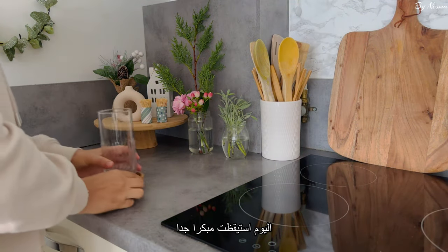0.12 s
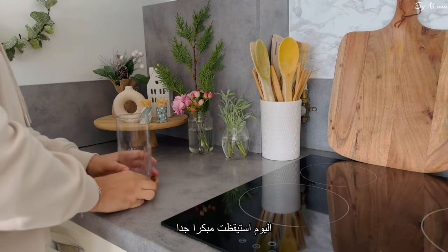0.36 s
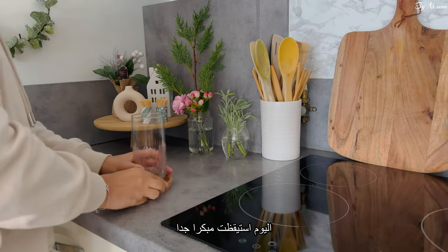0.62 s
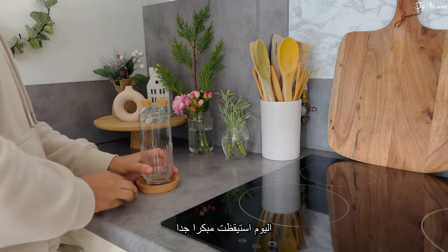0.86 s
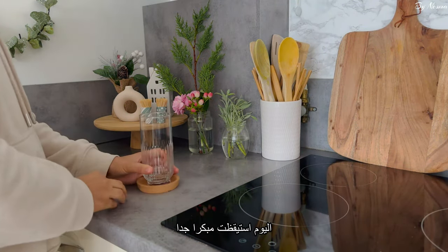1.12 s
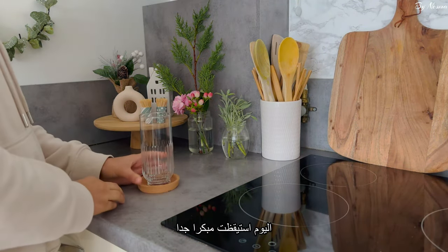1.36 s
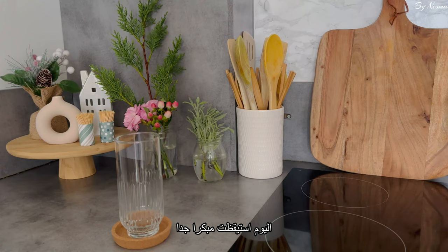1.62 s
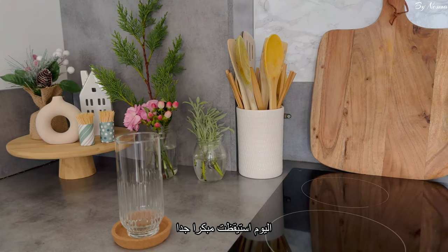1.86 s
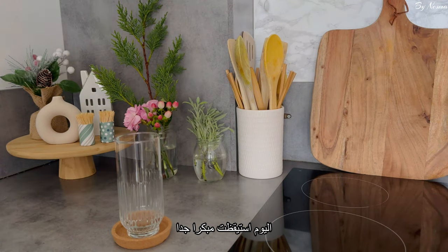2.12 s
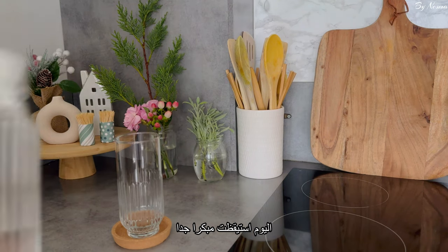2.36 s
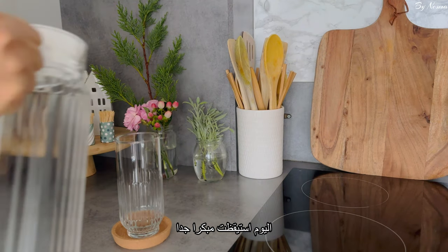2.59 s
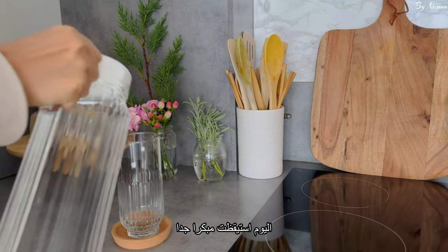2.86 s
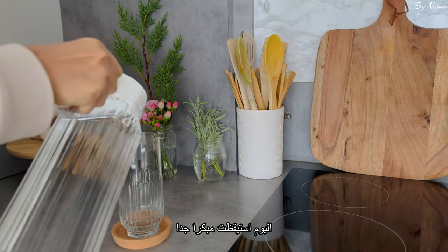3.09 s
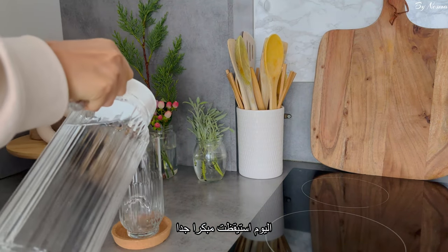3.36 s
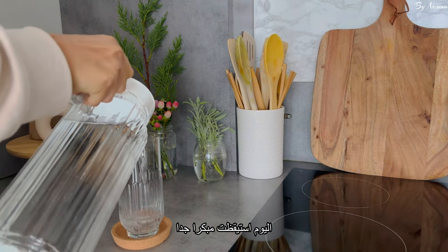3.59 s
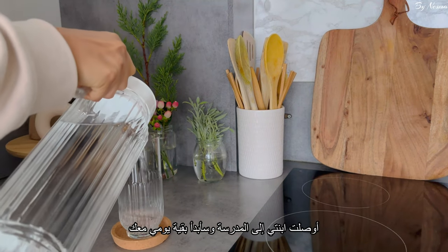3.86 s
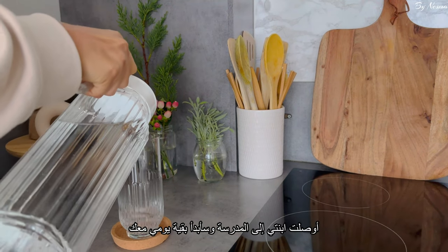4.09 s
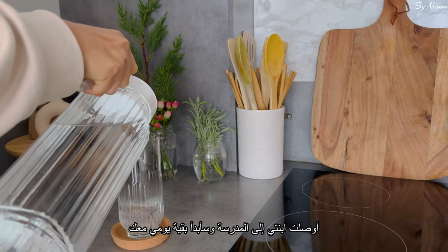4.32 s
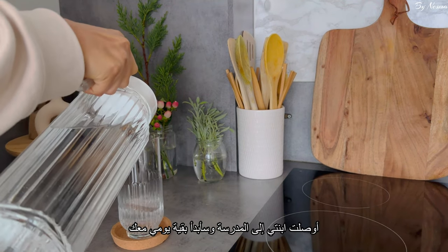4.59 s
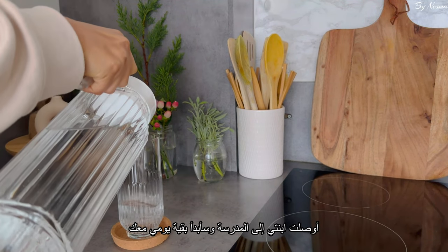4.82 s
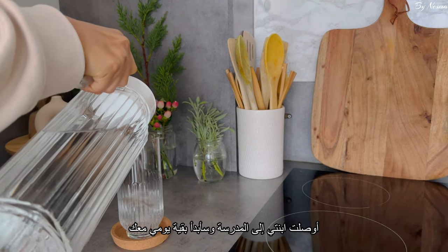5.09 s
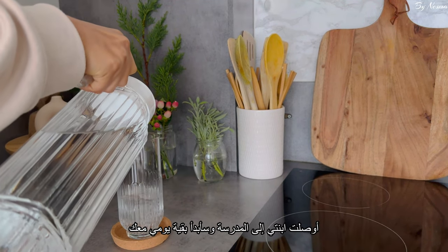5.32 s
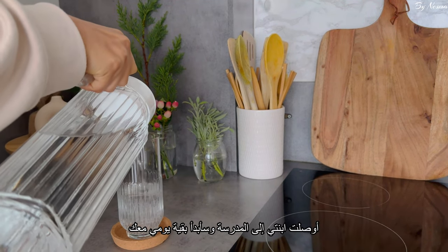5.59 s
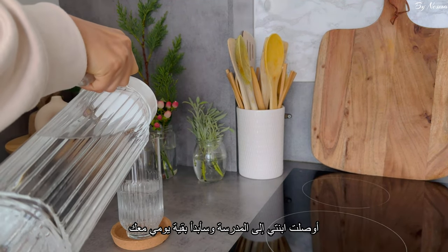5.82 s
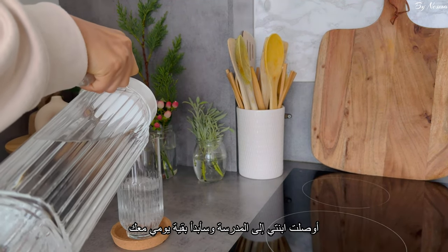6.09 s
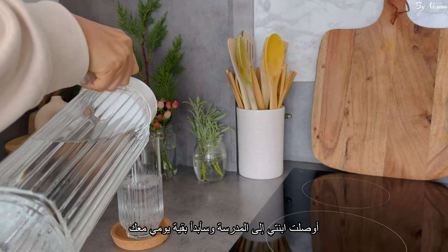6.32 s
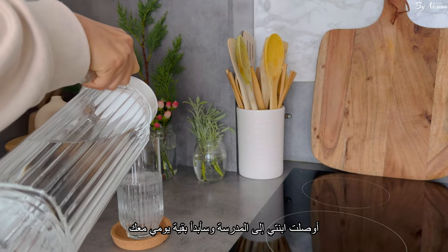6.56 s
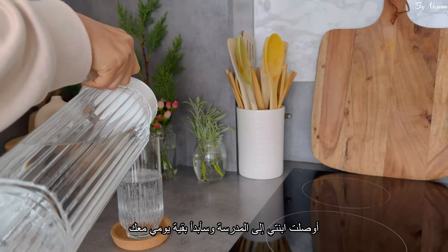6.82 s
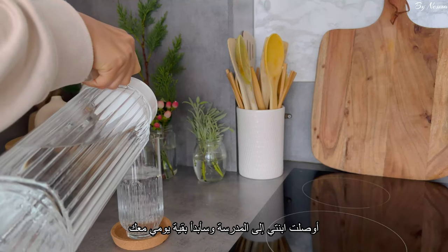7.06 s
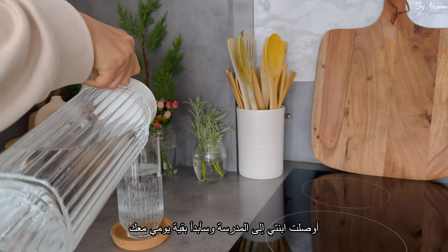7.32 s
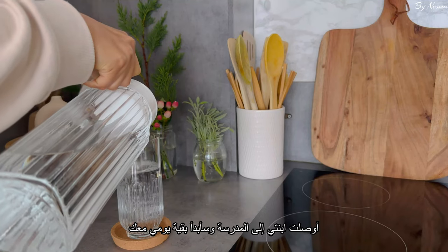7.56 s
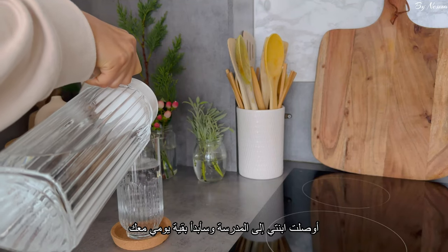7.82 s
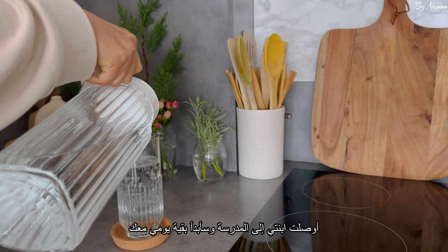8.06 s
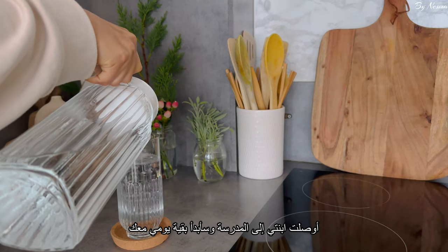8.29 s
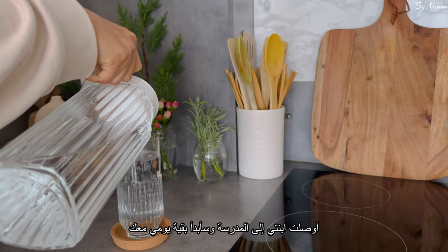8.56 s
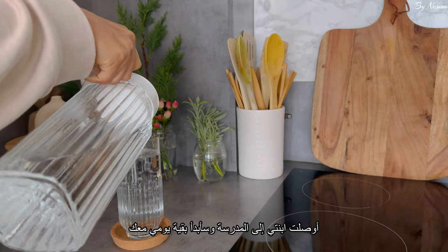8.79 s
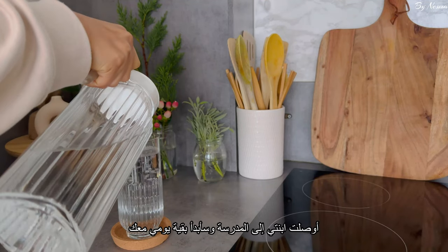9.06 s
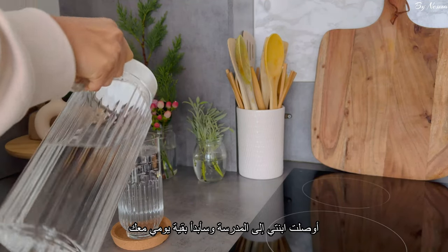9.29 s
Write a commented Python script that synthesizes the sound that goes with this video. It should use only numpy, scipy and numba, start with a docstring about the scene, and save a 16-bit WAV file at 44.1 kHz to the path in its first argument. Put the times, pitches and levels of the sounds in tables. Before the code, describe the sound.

A quiet small kitchen heard through close stereo microphones, with short reflections. First a hard wooden knock and brief gritty sliding, then lighter taps and one short glass clink. After a pause, water pours into a tall glass: hollow low bubbles, ringing splashes and bright spray, strongest early, gradually softer and higher. Sparse droplets follow, then a muted bump and a last small splash of drips.

```python
"""Room air and an appliance hum come first; then, close by on a kitchen counter, a glass on a wooden coaster
is set down and slid into place. A carafe clinks, then water is poured: the air column above the water rises in
pitch as the glass fills, the bubble cloud below it sinks in pitch, and splashes fizz in bursts.
Knocks, clinks and bubbles are dying tones; air, hum, rubbing, stream and splash are filtered noise or grains,
the hum with added sines. Two close microphone ports fall out of step in the treble."""
import sys
import numpy as np
from scipy import signal
from scipy.fft import rfft, irfft, next_fast_len
from scipy.io import wavfile
from scipy.ndimage import uniform_filter1d
from numba import njit

SR = 44100
rng = np.random.default_rng(int(sys.argv[2]) if len(sys.argv) > 2 else 0)


def materialize(psi):
    """Save the field psi as 16-bit PCM at rate SR to the path in sys.argv[1].

    A 1-D psi becomes a single channel; in a 2-D psi each row is a channel.
    """
    bounded = np.clip(np.atleast_2d(psi).T, -1, 1)
    quanta = np.round(bounded * 32767).astype(np.int16)
    wavfile.write(sys.argv[1], SR, quanta)


def invert_db(level):
    """Linear amplitude ratio for a level in decibels (20 dB per decade), elementwise."""
    return 10 ** (np.asarray(level, dtype=float) / 20)


N = 415422
NOW_S = np.arange(N) / SR

# room air, spectrum: pitch_hz [Hz], density_db [dB per Hz]
AIR_SPECTRUM = [(15, -46), (25, -22.5), (92, -3), (142, -11.5), (219, -8), (264, -17.5), (1670, -33),
                (2020, -26), (2250, -31.5), (8980, -40), (11500, -38.5), (14600, -38.5), (16300, -61)]
# appliance hum: pitch_hz [Hz], width_hz [Hz], level_db [dB]
HUM_TONES = [(86.7, 4.6, -1.5), (173.2, 8.6, -12)]
# room air over time, which the hum follows: time_s [s], level_db [dB]
ROOM_LEVEL = [(0, -61.5), (.5, -62), (1.62, -61.5), (1.7, -60), (2.6, -60.5), (4.76, -60), (4.82, -63),
              (6.6, -65), (6.75, -67.5), (8.3, -68), (8.98, -60), (9.15, -62.5), (9.42, -61)]
HUM_OVER_AIR_DB, HUM_FOLLOWS = 1, 2.02  # mean hum over mean air; hum swing per dB of air swing
# coaster and sleeve rubbing: start_s [s], end_s [s], level_db [dB]
RUBS = [(.05, .1, -67), (.2, .24, -58), (.33, .47, -64), (.5, .9, -62.5), (1.185, 1.26, -59),
        (1.25, 1.272, -56), (1.94, 2.17, -66), (2.45, 2.7, -71)]
# rubbing grit, spectrum: pitch_hz [Hz], density_db [dB per Hz]
RUB_SPECTRUM = [(410, -66), (700, -33), (1110, -11), (2160, -12.5), (2330, -53), (2700, -13), (7110, -20.5),
                (11500, -37.5), (16000, -22)]
RUB_SWELL_DB_PER_S, RUB_FADE_DB_PER_S = 353, 225
# a sleeve brushes past: start_s [s], end_s [s], level_db [dB]
SLEEVE_BRUSHES = [(.215, .24, -57.5), (1.95, 2.0, -73)]
# knocks on the counter: start_s [s], level_db [dB], low_body_db [dB], softness_hz [Hz]
KNOCKS = [(0.2313, -19, 0, 2400), (.272, -31, 5.5, 1500), (0.3, -38.5, 8, 1220), (0.346, -38, 0, 1000),
          (1.491, -57, -15, 4150), (1.943, -46.5, -5, 1980), (2.148, -52.5, 5, 1600),
          (8.988, -36.5, -15, 1220)]
# counter modes: pitch_hz [Hz], level_db [dB], t60_s [s]
COUNTER_MODES = [(155.4, -2.5, 0.15), (438, -3, 0.022), (745, 2, 0.018), (1110, -31, 0.037),
                 (1774, 1, 0.012), (2260, -50, 0.026)]
# kitchen reflections: pitch_hz [Hz], t60_s [s]
KITCHEN_DECAY = [(300, 0.33), (800, 0.37), (2000, 0.43), (5000, 0.29)]
# the low drone comes and goes: start_s [s], end_s [s], level_db [dB]
DRONES = [(.36, .45, -54.5), (1.7, 2.45, -52.5), (3.95, 4.72, -55), (8.95, 9.02, -55.5)]
DRONE_SWELL_DB_PER_S, DRONE_FADE_DB_PER_S, DRONE_REST_DB = 78, 120, -104
# the glass sings under the last push: start_s [s], end_s [s], level_db [dB]
SQUEAKS = [(1.175, 1.275, -64.5)]
SQUEAK_HZ = 2340
# carafe clinks: start_s [s], level_db [dB]
CLINKS = [(2.0337, -27.5)]
# carafe modes: pitch_hz [Hz], level_db [dB], t60_s [s]
CARAFE_MODES = [(1270, -42, 1), (1537, -35, 0.58), (2214, -12.5, 0.099), (2770, -6, 0.03),
                (3150, -15, 0.058), (4120, -14, 0.036), (5140, -11, 0.039), (5620, -5, 0.026),
                (8300, -19, 0.043), (12900, -19, 0.045)]
# the tilted carafe rings faintly: start_s [s], level_db [dB], pitch_hz [Hz], t60_s [s]
TILT_RINGS = [(3.176, -55, 600, 0.077), (3.2, -65.5, 6400, 0.17), (3.225, -79, 5270, 0.46),
              (3.24, -82, 2070, 0.32)]
# the stream: time_s [s], air_column_db [dB], splash_db [dB]
STREAM = [(3.1, -76, -90), (3.438, -68, -103), (3.462, -76, -44.5), (3.701, -63, -45.5), (3.84, -57, -37.5),
          (3.998, -63.5, -46.5), (4.7, -45.5, -46), (5.3, -60, -51), (5.9, -58, -53), (6.2, -53.5, -57),
          (6.4, -79.5, -59), (6.55, -52, -53.5), (6.72, -76, -59.5), (7.33, -69.5, -60.5),
          (7.42, -106, -68), (7.5, -105, -68), (7.6, -103, -65.5), (7.799, -70, -56.5), (8.05, -88.5, -70),
          (8.55, -106, -64.5), (8.8, -94, -69), (9.08, -90, -81), (9.28, -103, -82), (9.42, -53.5, -66)]
# splash, spectrum: pitch_hz [Hz], density_db [dB per Hz]
SPLASH_SPECTRUM = [(530, -22), (900, -12), (1100, -2.5), (1430, 1.5), (2050, -1.5), (3020, 0), (7000, -9.5),
                   (9100, -25.5), (15400, -120)]
# glass modes the splash rings in: pitch_hz [Hz], width_hz [Hz], level_db [dB]
GLASS_RINGS = [(2050, 87, -10), (2430, 34, -8), (2800, 18, -16.5), (3290, 58, -12.5), (3890, 38, -17.5)]
# fine spray, spectrum: pitch_hz [Hz], density_db [dB per Hz]
SPRAY_SPECTRUM = [(4000, -1), (5000, 5), (6400, 4), (8400, 2), (11000, 1.5), (14400, 2), (16300, -12)]
# spurts of spray: start_s [s], level_db [dB], t60_s [s], brightness_db [dB]
SPURTS = [(3.499, -52, 0.26, -3), (3.522, -46.5, 0.28, -1), (3.547, -48, 0.051, -15),
          (3.5803, -38.5, 0.097, 14), (3.6048, -41.5, 0.088, -6), (3.742, -70, 0.07, -34),
          (3.788, -51.5, 0.52, -4), (3.829, -49.5, 0.17, 2), (3.966, -54, 0.19, 1),
          (3.9973, -46.5, 0.36, -2.5), (4.1085, -41, 0.28, -29), (4.197, -64, 0.33, -33),
          (4.252, -51, 0.27, 1), (4.3936, -32.5, 0.11, 5), (4.426, -38.5, 0.32, -15),
          (4.5284, -45.5, 0.31, 1), (4.571, -30.5, 0.097, 22), (4.705, -43, 0.13, 0),
          (4.7875, -41, 0.15, -12), (4.905, -39, 0.084, 12), (4.916, -44, 0.25, -21),
          (5.035, -55, 0.12, -20), (5.073, -46.5, 0.28, -12), (5.128, -43.5, 0.2, -11),
          (5.175, -41, 0.13, 13), (5.21, -39, 0.16, -7), (5.249, -45.5, 0.47, -7), (5.2785, -48, 0.071, 11),
          (5.3358, -33.5, 0.057, 12), (5.387, -37, 0.13, 15), (5.408, -43.5, 0.26, -10),
          (5.471, -45, 0.22, 7), (5.621, -37, 0.13, 27), (5.642, -39, 0.17, 18), (5.687, -47, 0.1, -17),
          (5.797, -53.5, 0.11, 5), (6.04, -49.5, 0.25, 4), (6.077, -41, 0.068, 40), (6.187, -52, 0.087, 13),
          (7.0368, -58, 0.29, 17), (7.249, -47, 0.16, 13), (7.29, -58.5, 0.54, -25),
          (7.629, -48, 0.096, 22), (7.722, -73, 0.36, -8), (7.757, -50, 0.13, 30),
          (7.872, -76, 0.082, -11.5), (8.61, -75, 0.049, -18), (9.343, -43.5, 0.15, -29)]
SNAP_DB, SNAP_T60_S = -26, 0.0012  # each spurt opens with a snap
MIST_DB, MIST_FOLLOWS = -77, 0.33  # spray between spurts at mean splash; share of the splash's swing
BRIGHT_ABOVE_HZ = 9400  # splits the dull from the bright spray
DROPLETS_DB = -10.5  # pinging droplets relative to the hiss of the spray
# single bubbles and drips, with a few short spray pings and a faint ring of glass:
# start_s [s], level_db [dB], pitch_hz [Hz]
WATER_PINGS = [(3.439, -46, 5100), (3.4512, -30.5, 1760), (3.463, -32.5, 2800), (3.468, -42, 1726),
               (3.5, -42, 2100), (3.534, -47, 1350), (3.546, -24.5, 5150), (3.555, -31, 625),
               (3.6417, -33.5, 2800), (3.749, -35, 1764), (3.752, -34, 3620), (3.774, -37, 1230),
               (3.81, -33.5, 1560), (3.85, -35, 1097), (3.949, -34.5, 2430), (4.004, -41, 630),
               (4.005, -31, 910), (4.047, -18, 640), (4.101, -41, 3870), (4.154, -28, 664),
               (4.119, -40, 1790), (4.155, -32, 1880), (4.156, -29, 880), (4.1986, -47, 1990),
               (4.199, -32.5, 5130), (4.252, -30.5, 785), (4.279, -27, 743), (4.2984, -35.5, 1237),
               (4.299, -19, 649), (4.363, -30.5, 633), (4.398, -27, 650), (4.4248, -36, 5140),
               (4.436, -28, 630), (4.48, -36, 770), (4.529, -20, 676), (4.55, -16.5, 643),
               (4.575, -17, 610), (4.625, -22.5, 596), (4.686, -30, 2043), (4.687, -23, 639),
               (4.736, -21.5, 571), (4.9155, -40.5, 1110), (4.917, -28.5, 566), (5.075, -31, 870),
               (5.134, -19, 850), (5.216, -31.5, 856), (5.278, -21, 828), (5.342, -28, 800),
               (5.388, -36, 2430), (5.394, -27.5, 804), (5.415, -18, 830), (5.434, -38, 2430),
               (5.439, -23.5, 850), (5.472, -22.5, 820), (5.625, -38, 840), (5.645, -32.5, 830),
               (5.645, -28.5, 10100), (5.666, -39, 803), (5.735, -53, 2050), (5.741, -46, 1200),
               (5.776, -45, 2480), (5.841, -48, 2700), (5.76, -49, 930), (5.773, -30.5, 873),
               (5.784, -25.5, 836), (5.81, -35, 817), (5.83, -37.5, 850), (5.853, -40, 862),
               (5.877, -42, 875), (5.921, -36, 860), (5.797, -42, 1190), (5.956, -31.5, 855),
               (6.002, -32, 850), (6.0242, -37.5, 3150), (6.022, -29.5, 864), (6.049, -30, 920),
               (6.059, -42, 2340), (6.063, -38, 884), (6.087, -49, 810), (6.158, -23, 805),
               (6.1624, -37, 1110), (6.49, -42, 1226), (6.493, -27, 788), (6.783, -57, 1260),
               (6.827, -52, 1250), (6.8367, -45, 1053), (6.8356, -43, 4330), (6.858, -44, 1280),
               (6.946, -42, 1046), (6.896, -49, 2820), (7.065, -66, 1160), (7.083, -45.5, 1100),
               (7.17, -46, 7060), (7.21, -54, 3150), (7.254, -47, 3470), (7.296, -41.5, 1210),
               (7.368, -53, 1150), (7.489, -53, 1164), (7.4918, -52, 1517), (7.528, -49.5, 4500),
               (7.627, -50, 1160), (7.627, -51, 817), (7.635, -57, 2270), (7.729, -63, 1360),
               (7.764, -48.5, 1170), (7.767, -48.5, 2510), (7.813, -50, 1180), (7.8754, -53, 2200),
               (7.927, -56, 2430), (8.0498, -54.5, 2050), (8.176, -56.5, 1236), (8.176, -54.5, 2800),
               (8.336, -51, 3580), (8.4465, -42, 1803), (8.447, -54, 2935), (8.486, -51, 1670),
               (8.519, -60, 1710), (8.7652, -50, 2120), (8.845, -40.5, 2050), (8.9, -61, 2140),
               (8.942, -55, 2050), (8.947, -49.5, 1565), (8.99, -59, 1270), (8.992, -53, 2190),
               (9.0555, -53, 2100), (9.31, -41, 2020), (9.323, -33, 1852), (9.323, -33, 2320),
               (9.345, -41, 5100), (9.346, -41, 6620)]
LARGE_BELOW_HZ = 950
LARGE_CYCLES, SMALL_T60_S, SMALL_CYCLES = 32, 0.05, 100  # ring lengths to -60 dB
CLUSTER_DB, CLUSTER_DETUNE, CLUSTER_LASTS_S = -7, 0.085, 0.074  # three neighbours of a small ping
CALM_FROM_S, CALM_T60_S = 8.4, 0.047  # the last drips fall on still water
PLOP_DB, PLOP_OCTAVES, PLOP_T60_S = -9, .25, .07  # rough noise around a small ping
POUR_START_S, POUR_END_S = 3.44, 8.9
EMPTY_DEPTH_M, RISE_M_PER_S, SOUND_M_PER_S = .14, 0.01756, 343  # the air is a quarter wave long
THIRD_MODE = 2.87  # pitch of the column's next mode over its first
CLOUD_HIGH_HZ, CLOUD_LOW_HZ, CLOUD_SINKS_S, CLOUD_SINK_TAKES_S = 628, 347, 4.9, 0.27
CLOUD_LOUDEST_S, CLOUD_VARIANCE_S2 = 5.02, 0.12  # the cloud speaks up while it sinks
CLOUD_RANGE_DB, CLOUD_DB, CLOUD_ANSWER_DB = 21.5, -56.5, -3
# likeness of the two microphone ports: pitch_hz [Hz], likeness [0 to 1]
LIKENESS = [(60, .96), (290, .8), (700, .75), (1300, 0), (4000, .05), (6500, .65), (8500, .995),
            (12000, .995), (13500, .85)]
# phase of the left port: pitch_hz [Hz], phase_rad [radians]
PORT_TURN = [(7500, 0), (9000, -.4), (10000, -1.8), (10800, -2.9), (12000, -3.5), (13300, -5.9),
             (16000, -6.8)]
CUTOFF_HZ = 16600


def rms_one(x):
    """Scales to rms 1."""
    return x / np.sqrt(np.mean(x ** 2) + 1e-20)


def filtered(x, order, hz, kind="low"):
    """Butterworth filter."""
    return signal.sosfilt(signal.butter(order, hz, kind, fs=SR, output="sos"), x)


def in_time(rows):
    """Each column after the first, interpolated over the whole scene."""
    s, *columns = np.transpose(rows)
    return [np.interp(NOW_S, s, c) for c in columns]


def at_hz(points, hz):
    """A table read at a pitch, interpolated in log frequency."""
    table_hz, value = np.transpose(points)
    return np.interp(np.log(hz), np.log(table_hz), value)


def drift(rate_hz, spread_db=None):
    """Slow chance of spread 1, or as a gain that wavers by spread_db."""
    r = np.exp(-40 * np.pi * rate_hz / SR)  # computed at a twentieth of the sample rate
    noise = rng.standard_normal(N // 20 + 2002)
    slow = rms_one(signal.lfilter([1], [1, -2 * r, r * r], noise)[2000:])
    values = slow if spread_db is None else invert_db(spread_db * slow)
    return np.interp(np.arange(N) / 20, np.arange(len(slow)), values)


def grains(per_s, spread_db):
    """Random clicks of uneven size."""
    sizes = invert_db(spread_db * np.minimum(rng.exponential(1, N), 5)) * rng.choice([-1, 1], N)
    return sizes * (rng.random(N) < per_s / SR) + 1e-18


def grain_pair(per_s, spread_db):
    """Two independent streams of grains."""
    return [grains(per_s, spread_db) for side in range(2)]


def two_ports(mid, side, hz):
    """Spreads a band over the two ports, as alike as LIKENESS says."""
    alike = np.clip(at_hz(LIKENESS, hz), 0, 1)
    return np.sqrt(1 + alike) * mid + np.sqrt(1 - alike) * side * [[1], [-1]]


def coloured(sources, spectrum, patchy_db):
    """Bands of two alternating source pairs, each with its own level, flicker and likeness; rms 1."""
    out, edges = 0, np.geomspace(25, 16500, 25)
    for k, (low, high) in enumerate(zip(edges, edges[1:])):
        hz = np.sqrt(low * high)
        if not spectrum[0][0] * .8 < hz < spectrum[-1][0] * 1.2:
            continue
        mid, side = filtered(sources[k % 2], 2, [low, high], "band")
        gain = invert_db(at_hz(spectrum, hz)) * drift(7.0, patchy_db)
        out = out + gain * two_ports(mid, side, hz)
    return rms_one(out)


@njit
def resonate(x, hz, width_hz, sr):
    """A resonance with a movable centre, wider as that passes 900 Hz or a higher start; gain 1 on top."""
    out = np.zeros(len(x))
    for i in range(2, len(x)):
        r = 1 - np.pi * width_hz * max(1., hz[i] / max(hz[0], 900.)) / sr
        driven = (1 - r * r) / 2 * (x[i] - x[i - 2])
        out[i] = driven + 2 * r * np.cos(2 * np.pi * hz[i] / sr) * out[i - 1] - r * r * out[i - 2]
    return out


def steady(hz):
    """A pitch that stays put."""
    return np.full(N, float(hz))


def resonate_twice(x, hz, width_hz, second_hz, second_width_hz):
    """Two resonances in a row; rms 1."""
    return rms_one(resonate(resonate(x, hz, width_hz, SR), second_hz, second_width_hz, SR))


def add(out, s, db, hz, t60, rise_s, climb=0.):
    """One dying tone with a soft start, climbing in pitch as it dies (sinking if climb is negative)."""
    t = np.arange(int(np.clip(t60, .004, 1) * SR)) / SR
    envelope = invert_db(db - 60 * t / t60) * (1 - np.exp(-t / rise_s))
    tone = envelope * np.sin(2 * np.pi * hz * (t + climb * t ** 2 / t60))
    at = max(round(s * SR), 0)
    out[at:at + len(t)] += tone[:len(out) - at]


def after(events, t60):
    """An envelope that jumps at each event and dies away."""
    jumps = np.zeros(N)
    for s, db, *rest in events:
        jumps[round(s * SR)] = invert_db(db)
    return signal.lfilter([1], [1, -invert_db(-60 / (t60 * SR))], jumps + 1e-18)


def held(rows, swell_db_per_s, fade_db_per_s):
    """An envelope that swells up to each start, holds and fades after each end."""
    t = np.arange(0, N / SR, .002)
    levels = []
    for start, end, db in rows:
        swell = swell_db_per_s * np.maximum(start - t, 0)
        fade = fade_db_per_s * np.maximum(t - end, 0)
        levels.append(db - swell - fade)
    return np.interp(NOW_S, t, invert_db(np.max(levels, axis=0)))


def background():
    """Room air is coloured noise; the appliance hum is sines with narrow noise that makes them waver."""
    air_db, = in_time(ROOM_LEVEL)
    hum_db = air_db.mean() + HUM_OVER_AIR_DB + HUM_FOLLOWS * (air_db - air_db.mean())
    white = rng.standard_normal(N)
    hum = 0
    for hz, width_hz, db in HUM_TONES:
        waver = rms_one(resonate(white, steady(hz), width_hz, SR))
        hum = hum + invert_db(db) * (0.35 * waver + 1.28 * np.sin(2 * np.pi * hz * NOW_S))
    air = coloured(rng.standard_normal((2, 2, N)), AIR_SPECTRUM, patchy_db=2.5)
    return invert_db(air_db) * air + invert_db(hum_db) * hum


def rubbing():
    """Wood dragged over stone: fine dense grit that stirs the upper counter modes."""
    sources = [grain_pair(8000, spread_db=2.5) for pair in range(2)]
    both = []
    for grit in coloured(sources, RUB_SPECTRUM, patchy_db=1.2):
        stirred = sum(resonate(grit, hz * (1 + .025 * drift(6)), 90., SR) for hz, db, t60 in COUNTER_MODES[3:])
        both.append(grit + 2.2 * stirred)
    return held(RUBS, RUB_SWELL_DB_PER_S, RUB_FADE_DB_PER_S) * np.array(both)


def sleeve():
    """Cloth hisses softly in the treble: a band of noise."""
    hiss = rms_one(filtered(rng.standard_normal(N), 2, [4200, 10500], "band"))
    return held(SLEEVE_BRUSHES, 360.0, 340.0) * hiss


def knock(db, body_db, soft_hz):
    """Wood on the counter: short modes, a low body that swells late and a dull rattle."""
    t = np.arange(SR // 3) / SR
    rough = np.diff(signal.lfilter([1], [1, -.96], rng.standard_normal(len(t) + 1)))
    decay = invert_db(db + 0.5 - 60 * t / 0.076) + invert_db(db - 23.5 - 60 * t / 0.8)
    one = rough * (1 - np.exp(-t / 0.0014)) * decay
    for hz, mode_db, t60 in COUNTER_MODES:
        level_db = db + mode_db - 0.5 + body_db * (hz < 300)
        add(one, 1.166 / hz, level_db, hz, t60, rise_s=0.59 / hz)
    return signal.sosfilt(signal.cheby1(6, 1, soft_hz, fs=SR, output="sos"), one)


def knocks():
    """Every blow on the counter, each struck afresh."""
    out = np.zeros(N)
    for s, db, body_db, soft_hz in KNOCKS:
        out[round(s * SR):][:SR // 3] += knock(db, body_db, soft_hz)
    return out


def kitchen(x):
    """Reflections as noise that dies band by band, its likeness in the two ports set by LIKENESS."""
    t = np.arange(SR // 2) / SR
    tail = 0
    for hz, t60 in KITCHEN_DECAY:
        noise = filtered(rng.standard_normal((2, len(t))), 1, [hz / 2, hz * 2], "band")
        mid, side = noise * invert_db(-60 * t / t60) * (t > .003)
        tail = tail + two_ports(mid, side, hz)
    return signal.fftconvolve(x[None], tail / np.sqrt(np.sum(tail ** 2) / 2), axes=1)[:, :N]


def drone():
    """Noise through two low resonances makes a drone that comes and goes."""
    low = resonate_twice(rng.standard_normal(N), steady(58.2), 9.2, steady(56.0), 66.0)
    return (invert_db(DRONE_REST_DB) + held(DRONES, DRONE_SWELL_DB_PER_S, DRONE_FADE_DB_PER_S)) * low


def squeak():
    """The pushed glass sings: noise through two resonances at one pitch."""
    sung = resonate_twice(rng.standard_normal(N), steady(SQUEAK_HZ), 40.0, steady(SQUEAK_HZ), 120.0)
    return held(SQUEAKS, 460.0, 900.0) * sung


def carafe():
    """Glass on glass: a noise crack and ringing modes, then faint rings as the carafe tilts."""
    out = np.zeros(N)
    for s, db in CLINKS:
        for hz, mode_db, t60 in CARAFE_MODES:
            add(out, s, db + mode_db - 0.5, hz, t60, rise_s=0.002)
    for s, db, hz, t60 in TILT_RINGS:
        add(out, s, db, hz, t60, rise_s=0.0055)
    crack = filtered(rng.standard_normal(N), 3, 2000, "high")
    return out + crack * (invert_db(-10.0) * after(CLINKS, t60=0.048) + invert_db(-23) * after(CLINKS, t60=0.15))


def sized(large):
    """The large (low) or the small (high) entries of WATER_PINGS."""
    return [row for row in WATER_PINGS if (row[2] < LARGE_BELOW_HZ) == large]


def fizz(per_s, low_hz, high_hz, cycles, climb):
    """A random crowd of small bubbles, each a short rising chirp at its own place; rms 1."""
    out, start = np.zeros((2, N + SR)), STREAM[0][0]
    lasts = N / SR - start
    for when, pitch, size, place in rng.random((int(per_s * lasts), 4)):
        hz = low_hz * (high_hz / low_hz) ** pitch
        tone = np.zeros(int(cycles / hz * SR * .7))
        add(tone, 0, -3.5 * np.log(size + 0.013), hz, cycles / hz, rise_s=0.00015, climb=climb)
        for port in range(2):
            at = round((start + when * lasts + 0.00041 * place * port) * SR)
            out[port, at:at + len(tone)] += invert_db(3.6 * (place - .5) * (0.5 - 2 * port)) * tone
    return rms_one(out[:, :N])


def spurts(way):
    """Envelope of the spurts in the dull (-1) or the bright (+1) part of the spray."""
    out = np.zeros(N)
    for s, db, t60, bright_db in SPURTS:
        at = round(s * SR)
        t = np.arange(min(int(1.5 * t60 * SR), N - at)) / SR
        out[at:at + len(t)] += invert_db(db + min(way * bright_db, 0) - 60 * t / t60)
    return out


def ringing_splash():
    """Dense grains of falling water ring in the glass wall, which the water damps more and more."""
    drops = grain_pair(900, spread_db=1.5)
    wet = coloured([drops, drops], SPLASH_SPECTRUM, patchy_db=2.0)
    undamped = invert_db(-1.5 * np.maximum(NOW_S - CLOUD_SINKS_S, 0) + 3 * drift(6))
    both = []
    for ch in wet:
        wall = sum(invert_db(db + 14.0) * resonate(ch, steady(hz), width_hz, SR) for hz, width_hz, db in GLASS_RINGS)
        both.append(0.22 * ch + undamped * wall)
    return rms_one(np.array(both))


def fine_spray():
    """Very dense grains hiss, with pinging droplets among them."""
    mist = grain_pair(4000, spread_db=2.0)
    hiss = coloured([mist, mist], SPRAY_SPECTRUM, patchy_db=2.2) * invert_db(3 * drift(40))
    return hiss + invert_db(DROPLETS_DB) * fizz(110, low_hz=4855, high_hz=9900, cycles=530.0, climb=0.0041)


def splash():
    """Grains ring in the glass among small bubbles; finer spray comes in spurts that open with a snap."""
    splash_db = in_time(STREAM)[1]
    spray = fine_spray()
    low = filtered(spray, 4, BRIGHT_ABOVE_HZ)
    high = filtered(spray, 4, BRIGHT_ABOVE_HZ, "high")
    dull, bright = spurts(-1), spurts(1)
    mist_level = invert_db(MIST_DB + MIST_FOLLOWS * (splash_db - splash_db.mean()))
    burst = mist_level + invert_db(SNAP_DB) * after(SPURTS, SNAP_T60_S)
    # spurts and small pings bring larger drops with them
    surface = invert_db(splash_db - 0.5) * drift(14, spread_db=3.0)
    surface = surface + invert_db(-33.0) * dull + invert_db(-13.5) * after(sized(False), t60=0.069)
    small = fizz(300, low_hz=1106, high_hz=4593, cycles=170.0, climb=0.015)
    body = surface * (0.54 * ringing_splash() + 0.21 * small)
    return (NOW_S > STREAM[0][0]) * (body + (burst + dull) * low + (burst + bright) * high)


def fill():
    """Pitches of the shortening air column and bubble cloud, and the cloud's level below its loudest."""
    poured_s = np.clip(NOW_S, POUR_START_S, POUR_END_S) - POUR_START_S
    depth_m = EMPTY_DEPTH_M - RISE_M_PER_S * poured_s
    sunk = 1 / (1 + np.exp((CLOUD_SINKS_S - NOW_S) / CLOUD_SINK_TAKES_S))
    cloud_hz = CLOUD_HIGH_HZ + (CLOUD_LOW_HZ - CLOUD_HIGH_HZ) * sunk
    loudest = np.exp(-(NOW_S - CLOUD_LOUDEST_S) ** 2 / CLOUD_VARIANCE_S2 / 2)
    return SOUND_M_PER_S / 4 / depth_m, cloud_hz, -CLOUD_RANGE_DB * (1 - loudest)


def plop(db, hz, noise):
    """A rough burst of noise around a small ping's pitch."""
    t = np.arange(len(noise)) / SR
    band = rms_one(filtered(noise, 2, hz * 2 ** (PLOP_OCTAVES * np.array([-1, 1])), "band"))
    return invert_db(db + PLOP_DB - 60 * t / PLOP_T60_S) * (1 - np.exp(-t / 0.0022)) * band


def water_pings():
    """Bubbles, drips, spray pings and a faint ring of glass: brief tones that climb, or sink once it is calm.
    Large bubbles also shake the cloud; small pings come in clusters with a plop."""
    out, (column_hz, cloud_hz, cloud_db) = np.zeros(N), fill()
    for s, db, hz in sized(True):
        at = round(s * SR)
        add(out, s, db, hz, LARGE_CYCLES / hz, rise_s=0.0029, climb=0.0038)
        add(out, s, db + CLOUD_ANSWER_DB + cloud_db[at], cloud_hz[at], .08, rise_s=0.0078)
    for s, db, hz in sized(False):
        t60, climb = min(SMALL_T60_S, SMALL_CYCLES / hz), .012
        if s >= CALM_FROM_S:
            t60, climb = CALM_T60_S, -.015
        add(out, s, db, hz, t60, rise_s=0.0021, climb=climb)
        out[round(s * SR):][:SR // 14] += plop(db - 3.5, hz, rng.standard_normal(SR // 14))
        for off, late in rng.random((3, 2)):
            near_hz = hz * (1 + CLUSTER_DETUNE * (2 * off - 1))
            near_db = db + CLUSTER_DB - 14.0 * late
            add(out, s + CLUSTER_LASTS_S * late, near_db, near_hz, 0.67 * t60, rise_s=0.00063, climb=climb)
    return out


def filling_glass():
    """The plunging stream drives the closed air column and the bubble cloud in lumps; pings churn the column."""
    column_db = in_time(STREAM)[0]
    column_hz, cloud_hz, cloud_db = fill()
    column_hz = column_hz * (1 + .018 * drift(9))  # the churned surface heaves
    third_hz = THIRD_MODE * column_hz
    drive = grains(600, spread_db=3.0) * invert_db(2.5 * drift(25) + 2.5 * drift(7))
    first = resonate_twice(drive, column_hz, 29.7, column_hz, 380.0)
    wall = resonate_twice(drive, steady(1238.5), 31.0, steady(1108), 170.0)  # a wall mode of the glass
    third = resonate_twice(drive, third_hz, 40.0, third_hz, 160.0)
    cloud = resonate_twice(drive, cloud_hz, 220.0, cloud_hz, 280.0)
    churn = invert_db(column_db) + invert_db(-18) * after(sized(True), t60=0.092)
    churn = churn + invert_db(-21.0) * after(sized(False), t60=0.08)
    churn = uniform_filter1d(churn, size=200)
    third_gain = invert_db(-5.0 - 0.054 * (column_hz - column_hz[0]))
    column = first + invert_db(-14.0) * wall * (column_hz < 1500) + third_gain * third
    return (NOW_S > POUR_START_S) * (churn * column + invert_db(CLOUD_DB + cloud_db) * cloud)


def scene():
    """Water is a little louder at the left port, blows are midway; the kitchen answers both."""
    water = filling_glass() + water_pings()
    solid = knocks() + carafe()
    near = water * invert_db(np.array([[1.3], [-1.3]])) + solid
    reflected = kitchen(invert_db(-5.5) * water + invert_db(-11.0) * solid)
    mix = near + reflected + background() + drone() + rubbing() + squeak() + sleeve() + splash()
    return mix * invert_db(np.array([[.6], [-.6]]))  # the left port is slightly louder overall


def top_cut(x):
    """Nothing passes above the cut-off."""
    return signal.sosfilt(signal.butter(12, 16660, fs=SR, output="sos"), x)


def record(dry):
    """The left port turns its phase by over a full cycle in the treble; the lowest bass and the top are cut."""
    size = next_fast_len(N)
    turn = np.exp(1j * at_hz(PORT_TURN, np.arange(size // 2 + 1) * SR / size + 1))
    ports = np.array([irfft(rfft(dry[0], size) * turn, size)[:N], dry[1]])
    cut = signal.sosfilt(signal.cheby2(12, 70, CUTOFF_HZ, fs=SR, output="sos"), ports)
    return top_cut(filtered(cut, 2, 36.0, "high"))


dry = scene()
out = record(dry)
materialize(out)
```